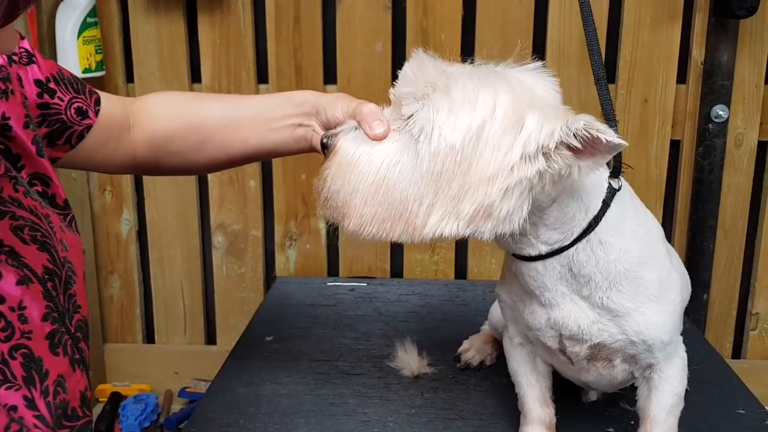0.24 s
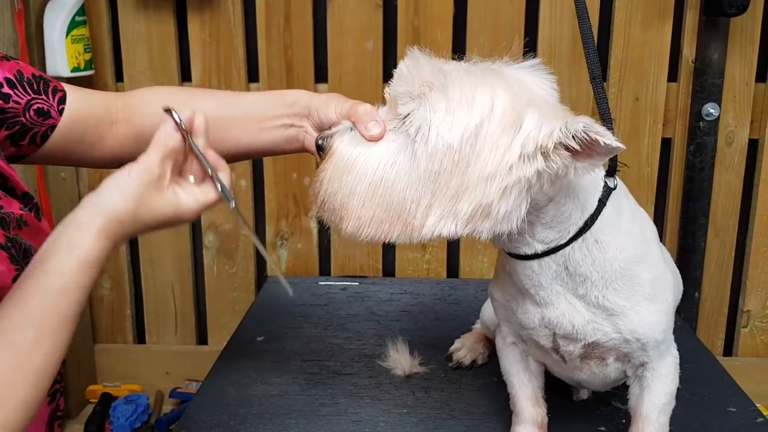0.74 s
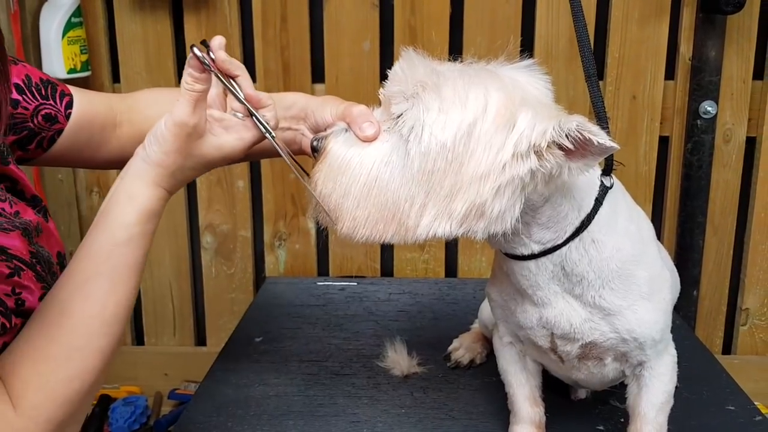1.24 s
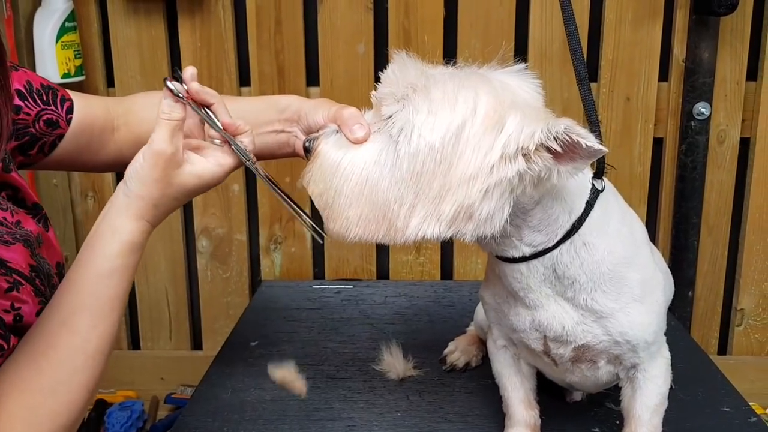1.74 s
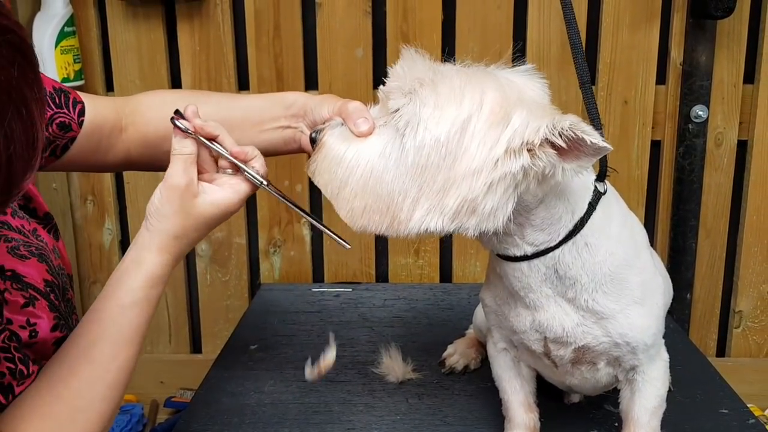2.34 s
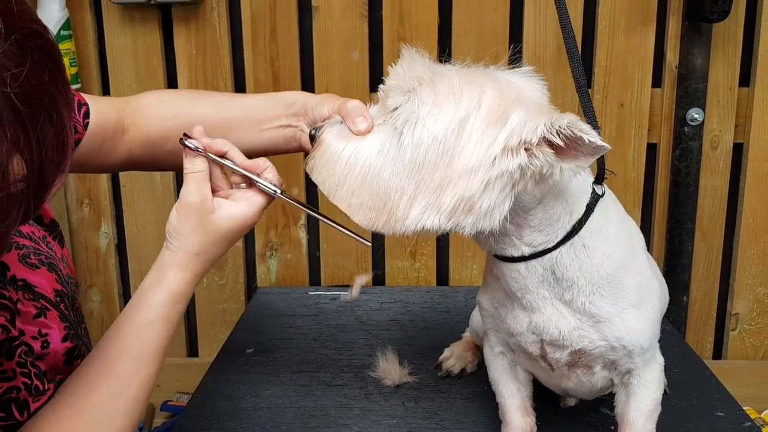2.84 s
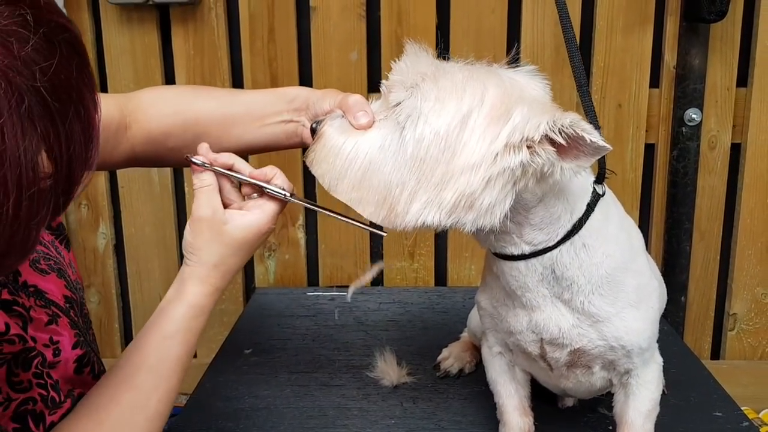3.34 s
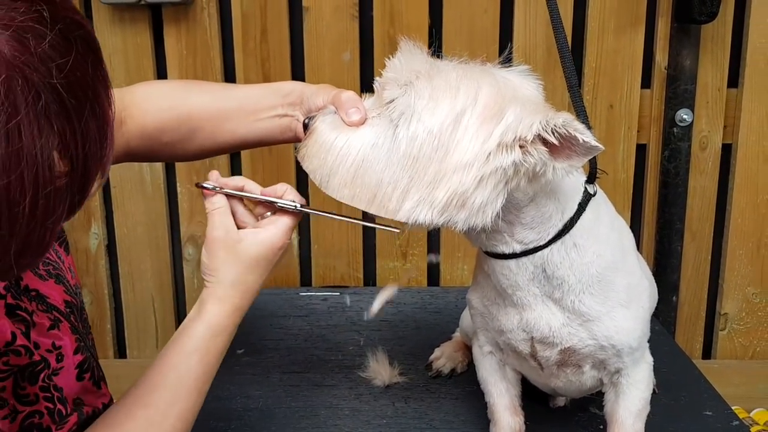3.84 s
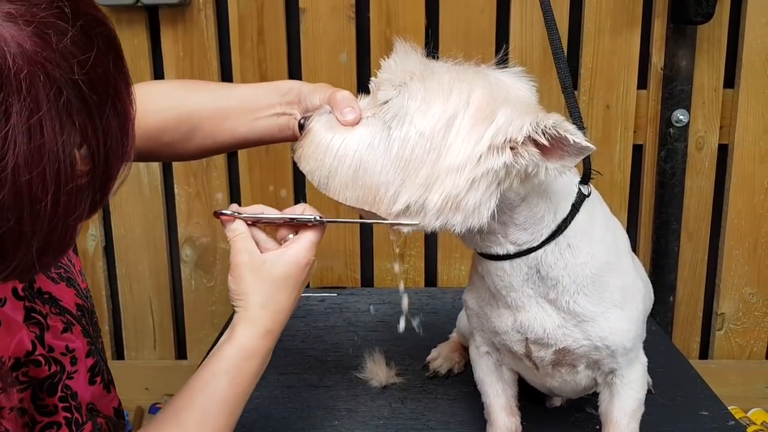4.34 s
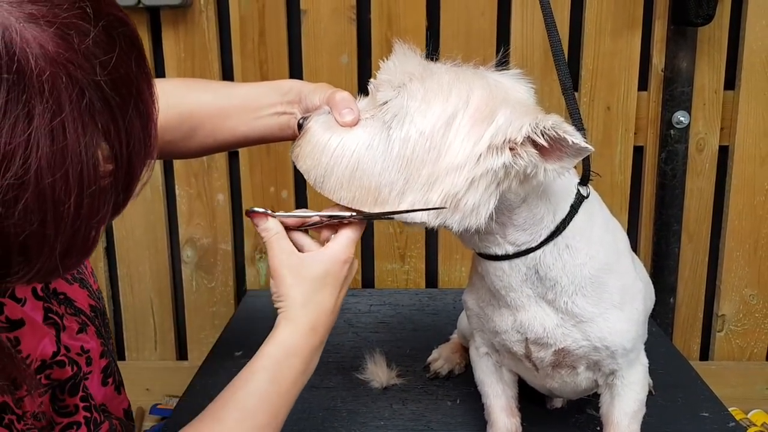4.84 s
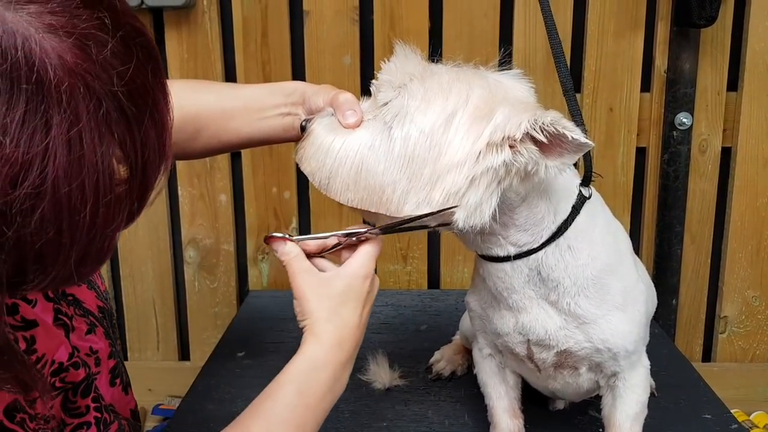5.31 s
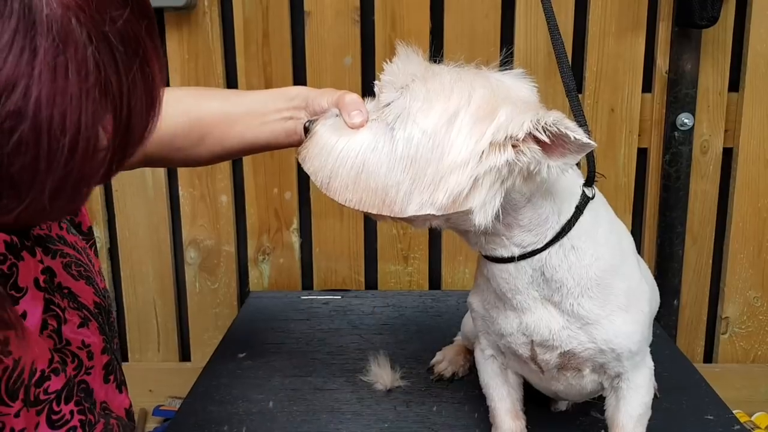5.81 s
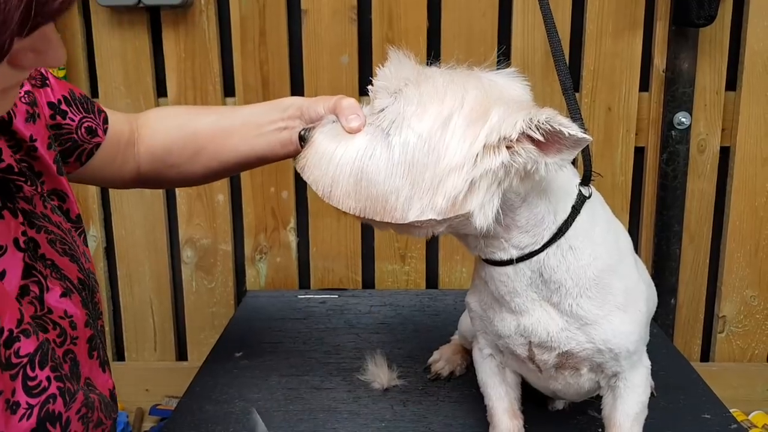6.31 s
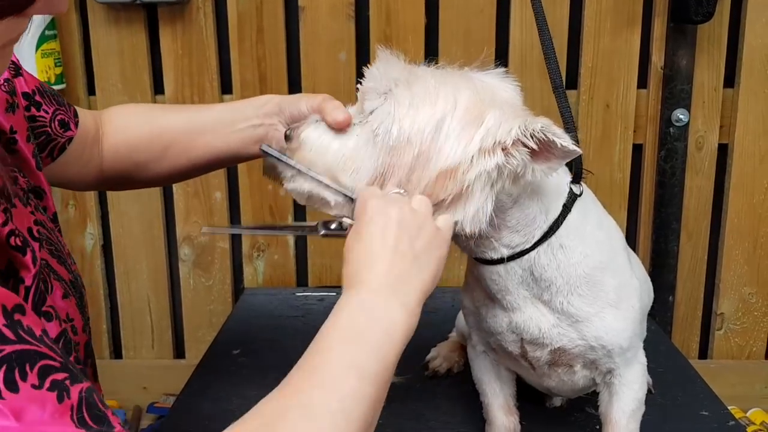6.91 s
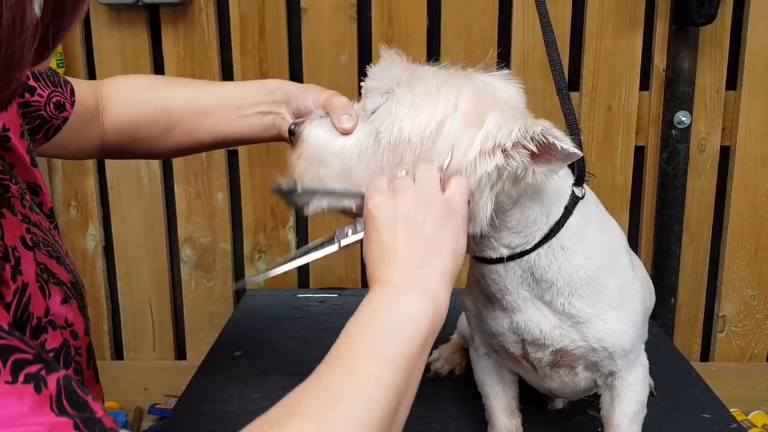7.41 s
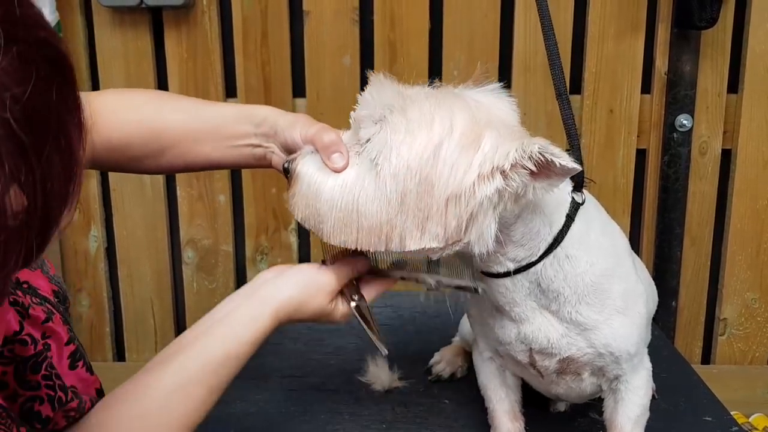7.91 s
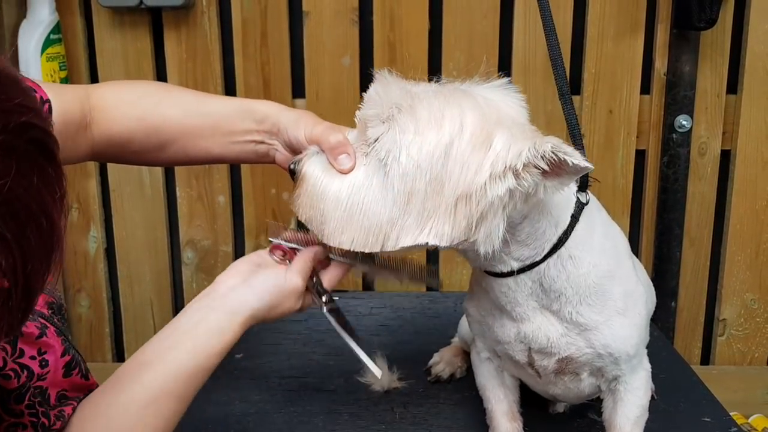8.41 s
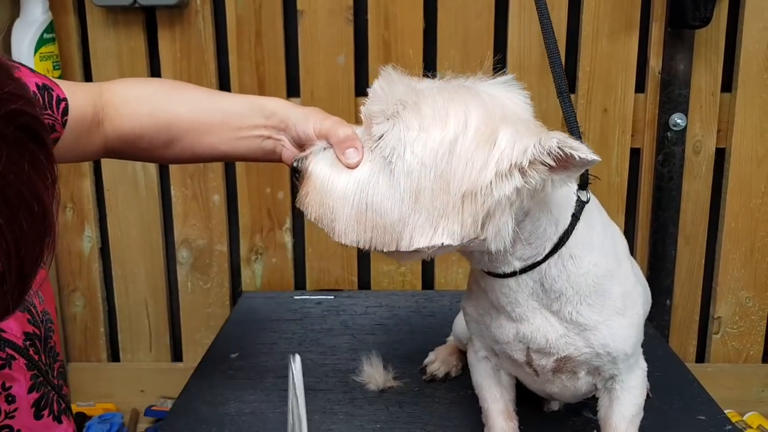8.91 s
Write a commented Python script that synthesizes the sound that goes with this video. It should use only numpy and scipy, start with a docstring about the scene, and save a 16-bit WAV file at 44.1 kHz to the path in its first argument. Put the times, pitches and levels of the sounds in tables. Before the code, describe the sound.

Scissors crunch through dry dog hair in eight crisp snips with squeaky openings, then tools clink and one loud hollow knock hits the table.

```python
"""Long steel scissors rasp through a dog's beard in a small wood-lined room, each cut ending in a click.
The blades chirp as they open again; tools clink, sleeves and fur rustle, and at last a tool lands hard
on the hollow grooming table. Friction is coloured random grains, the chirp a falling tone, struck steel
and wood are sums of decaying modes, rubbing is noise that swells and fades; air and a dull drone lie beneath."""
import sys
import numpy as np
from scipy import signal
from scipy.fft import rfft, irfft, next_fast_len
from scipy.io import wavfile

SR = 44100
rng = np.random.default_rng(int(sys.argv[2]) if len(sys.argv) > 2 else 0)


def master_out(mix):
    """Clip the mix to full scale and print it as 16-bit PCM to the path in sys.argv[1]."""
    frames = np.transpose(np.atleast_2d(mix))
    ceiling = np.clip(frames, -1, 1)
    pcm = np.round(ceiling * 32767).astype(np.int16)
    wavfile.write(sys.argv[1], SR, pcm)


N = 403956
TIME = np.arange(N) / SR

# Closing strokes: shut t/s, stroke length t/s, hair met before the shut t/s, time in the hair t/s,
# rasp level/dB, final shear level/dB, finger-stop tap level/dB, left-right level/dB, treble lift level/dB
CLOSING_STROKES = [(1.6130, .155, 0.052, 0.017, -55, -47.5, -49, -3, 5.5),
                   (2.232, 0.14, 0.085, 0.06, -56, -44, -47, -3.5, 1.5),
                   (2.8053, 0.13, 0.077, .058, -54, -40, -41, -4, -0.5),
                   (3.317, 0.11, 0.081, 0.064, -51.5, -36.5, -41, -3.5, 0.5),
                   (3.8122, .11, .070, 0.056, -50.5, -45, -48.5, -4.5, 5),
                   (4.4547, 0.29, 0.23, 0.097, -52, -36.5, -41.5, -4.5, -2.5),
                   (5.014, 0.11, .085, 0.087, -55.5, -40, -54, -4.5, 2),
                   (5.4705, .09, 0.067, 0.028, -51, -38, -49.5, -3.5, 3.5)]
# Opening strokes: squeak t/s, rasp level/dB, squeak level/dB, squeak f/Hz, left-right level/dB
OPENING_STROKES = [(1.792, -46.5, -45, 8170, -3), (2.423, -46, -40.5, 8360, -4.5),
                   (2.969, -45, -40, 8810, -2.5), (3.4945, -46, -35.5, 8710, -3),
                   (3.9782, -48, -34, 8760, -3.5), (4.643, -48, -60, 8620, -2.5),
                   (5.203, -49.5, -47, 8300, -2.5)]
# Clinks of scissors and comb: t/s, tick level/dB, ring level/dB
STEEL_CLINKS = [(0.228, -61.5, -83), (0.7245, -57.5, -81), (6.2579, -29.5, -63), (6.4315, -47, -66),
                (6.4876, -45.5, -78), (7.2916, -49, -62), (7.7536, -54.5, -62), (8.8136, -49, -57),
                (8.8753, -39, -47), (8.9085, -60, -53), (8.9861, -49, -53), (9.0215, -45, -51)]
# The tool lands on the table top, hops and lands again: t/s, level/dB, first contact brightness f/Hz
TABLE_BLOWS = [(8.9000, -11, 220), (8.9080, -7.5, 470), (8.9190, -8.3, 1600), (9.0050, -14.5, 2140),
               (9.0215, -18, 3370)]
# Padded bumps of paws, hands and tools on the table: t/s, level/dB, first contact brightness f/Hz
TABLE_BUMPS = [(0.004, -44, 1210), (0.070, -43.5, 580), (0.601, -56, 2120), (0.738, -57.5, 1500),
               (5.896, -48.5, 1000), (6.2585, -37, 2000), (6.279, -35, 1210), (6.303, -37.5, 1930),
               (6.486, -52.5, 3000), (8.867, -36, 2000)]
# Arm movements, and at 0.85 s an empty slide of the scissor blades:
# middle t/s, half length t/s, sleeve level/dB, fur or blade level/dB
RUBBING_MOVES = [(0.01, .1, -50.5, -70.5), (0.252, 0.048, -56.5, -74), (0.51, 0.12, -59, -83),
                 (0.86, .17, -56.5, -63.5), (0.85, 0.042, -78, -54), (6.012, 0.078, -55.5, -71.5),
                 (6.567, 0.18, -73, -69), (7.34, 0.043, -65, -72), (7.59, 0.1, -67, -71),
                 (7.882, 0.063, -73, -68), (8.27, 0.06, -64.5, -77), (8.692, 0.1, -68, -67.5)]
# Course of the dull drone, with a low rub of hair near 4.3 s: t/s, level/dB
DRONE_AND_RUB = [(0, -78), (1.1, -68), (2.6, -66.5), (3.7, -73.5), (4.3, -64), (5.6, -70), (6.8, -72.5),
                 (9.2, -77)]

# Modes of the hollow table: f/Hz, level/dB, t60/s
TABLE_MODES = [(86, -25, .9), (115, -15, .55), (164, -18, .35), (216, -5, .45), (245, -5, .12),
               (290, -10, .25), (311, -3.5, .45), (376, -1.5, .42), (451, -4, .3), (527, -8, .25),
               (573, -7, .2), (602, -4, .22), (691, -3, .18), (749, 0, .17), (800, -6, .15),
               (1060, -6, .12), (1097, -5, .13), (1740, -9, .13), (2073, -14, .22)]
# Modes of the steel tools: f/Hz, level/dB, t60/s
STEEL_MODES = [(4328, -13, .35), (6190, -14, .3), (7620, 0, .24), (8430, -5, .17), (10050, -7, .35),
               (11660, -14, .2), (12720, -6, .2), (13040, -9, .12)]

# Relative power spectrum of the cracking and rattling table top: f/Hz, level/dB
BOARD_SPECTRUM = [(25, -32), (55, -17), (105, -11.5), (230, 2), (480, 0), (750, 1), (1120, 0.5),
                  (1400, -9.5), (1850, -3), (2600, -13), (4000, -20), (8000, -25), (16000, -48)]
# Relative power spectrum of padded bumps: f/Hz, level/dB
THUMP_SPECTRUM = [(50, -17), (120, -14), (210, 6.5), (290, -3), (380, 0.5), (520, -3), (850, -15),
                  (2300, -9.5), (3500, -11), (16000, -61)]
# Relative power spectrum of hair being cut: f/Hz, level/dB
SHEAR_SPECTRUM = [(400, -32), (2000, -21), (2700, -16), (3300, -17), (3900, -4.5), (4600, -2.5), (5300, -5),
                  (6000, -10), (7300, -5), (8100, 1), (10200, -2), (12700, 1), (13700, -8), (15500, -8)]
# Relative power spectrum of bare edges sliding: f/Hz, level/dB
SLIDE_SPECTRUM = [(1000, -32), (4000, -43), (6200, -15), (7200, -4), (8000, -9.5), (8700, -1),
                  (10000, -2.5), (11200, -12), (12300, -4.5), (13500, -15.5), (16000, -17)]
# Relative power spectrum of the finger rings meeting: f/Hz, level/dB
TAP_SPECTRUM = [(120, -16), (330, 1), (600, 5.5), (1000, -2), (1600, -11), (2600, -7), (4000, -9),
                (8000, -4.5), (16000, -44)]
# Relative power spectrum of a steel tick: f/Hz, level/dB
TICK_SPECTRUM = [(300, -12), (1400, -9), (2400, -4), (3700, -6), (6000, -3), (9000, 1), (12500, -1),
                 (15500, -8)]
# Relative power spectrum of brushed fur and the empty blade slide: f/Hz, level/dB
BRUSH_SPECTRUM = [(240, -38), (400, -35), (595, 2.5), (1360, -7.5), (2430, -13), (3210, -19), (3850, -8.5),
                  (5560, -9), (8530, -5), (15500, -18)]
# Relative power spectrum of a rubbed sleeve: f/Hz, level/dB
CLOTH_SPECTRUM = [(40, -11.5), (90, 3.5), (140, 4), (210, -3.5), (300, -9), (600, -15.5), (1100, -17),
                  (2000, -27.5), (5000, -54), (16000, -47)]
# Relative power spectrum of the room air: f/Hz, level/dB
AIR_SPECTRUM = [(13, -39), (22, -2), (76, 2), (168, -8.5), (203, -12.5), (371, -16.5), (475, -24.5),
                (516, -19), (846, -24), (1140, -26), (1460, -31), (3820, -36.5), (6270, -37), (7190, -37.5),
                (15500, -34)]
# Relative power spectrum of the drone and the low rub: f/Hz, level/dB
DRONE_SPECTRUM = [(25, -9), (45, 13), (80, -7.5), (200, -8), (400, -8.5), (700, -11.5), (1080, -3.5),
                  (1400, -23), (2500, -28.5), (16000, -60)]

# Left-right likeness of diffuse sound: f/Hz, correlation
SIDE_CORRELATION = [(60, 0.95), (250, 0.87), (450, 0.67), (750, 0.13), (1400, 0), (3000, 0), (16000, 0)]
# Decay of the wood-lined room: f/Hz, t60/s
ROOM_DECAY = [(100, 0.25), (400, 0.15), (1500, 0.36), (4000, 0.19), (9000, 0.17), (16000, 0.12)]

SLIDE_DB = -63  # bare edges slide throughout the stroke, fastest in its middle
SETTLE_S = 0.015  # the blades come to rest just after the shut
# The rasp grows as hair bunches towards the tips
HAIR_ATTACK_S, HAIR_RELEASE_S, HAIR_SWELL_DB = 0.009, 0.0054, 3
TUFTS_PER_S, TUFT_DB = 140, 4  # uneven thickness of the hair
BITE_S, STOP_S, TAP_S = 0.0061, 0.0023, 0.0067  # rise and fall of the final shear; decay of the tap
OPEN_LEAD_S = 0.0155  # the blades part this long before the squeak
# Chatter after each contact: mean gap, loss per rebound and share of brightness kept
REBOUND_S, REBOUND_LOSS_DB, REBOUND_DULLS = 0.018, 6, 0.78
REST_SLEEVE_DB, REST_BRUSH_DB = -71.5, -84.5  # between movements
AIR_DB = -62
CUTOFF_HZ = 15800


def closing():
    """Stick-slip friction: edges slide, rasp through hair, shear hardest at the tips; finger rings tap."""
    force, edges, taps = np.zeros((3, 2, N))
    t_tap = span(0.022)
    tufts = from_db(TUFT_DB * flicker(TUFTS_PER_S))
    for shut, stroke, lead, length, rasp_db, shear_db, tap_db, side_db, _ in CLOSING_STROKES:
        meet = shut - lead
        start, through = shut - stroke, meet + length
        t = start + span(shut + SETTLE_S - start)
        depth = np.clip((t - meet) / length, 0, 1)
        attack = np.minimum(t - meet, 0) / HAIR_ATTACK_S
        release = np.maximum(t - through, 0) / HAIR_RELEASE_S
        in_hair = np.exp(attack - release)
        rasp = from_db(rasp_db + HAIR_SWELL_DB * (depth - 1.0)) * in_hair * np.interp(t, TIME, tufts)
        shear = from_db(shear_db) * np.exp(np.minimum(t - shut, 0) / BITE_S)
        stop = np.exp(-np.maximum(t - shut, 0) / STOP_S)
        speed = np.sin(np.linspace(0, np.pi, len(t)))
        add(force, start, np.hypot(rasp, shear) * stop * pan(side_db))
        add(edges, start, from_db(SLIDE_DB) * speed * pan(side_db))
        add(taps, shut, from_db(tap_db) * diffuse(len(t_tap)) * np.exp(-t_tap / TAP_S))
    hair = tint(force * friction(per_s=3200, size_db=3), SHEAR_SPECTRUM)
    steel = tint(edges * friction(per_s=14000, size_db=1.5), SLIDE_SPECTRUM)
    return off_axis(crisp(hair) + steel) + tint(taps, TAP_SPECTRUM)


def opening(rise_s=0.0034, slide_s=0.032, squeak_s=0.002, glide_s=0.002, lead_db=-11, overshoot=0.4,
            sink_db=-5, sink_s=0.01, low_hz=4300):
    """Friction-driven resonance: as the crossing nears the pivot a squeak falls, flares, sinks to a scrape."""
    force, squeaks, scrapes = np.zeros((3, 2, N))
    t = span(0.089)
    u = t - OPEN_LEAD_S  # time from the squeak's peak
    for peak, rasp_db, squeak_db, hz, side_db in OPENING_STROKES:
        start = peak - OPEN_LEAD_S
        rasp = from_db(rasp_db) * (1 - np.exp(-t / rise_s)) * np.exp(-(t / slide_s) ** 4)
        pitch = hz * (1 + overshoot * (1 - np.tanh(u / glide_s + 2)) / 2)
        # a faint early swell during the glide, then the flare at the blade resonance
        flare = np.exp(-(u / squeak_s) ** 2 / 2) + from_db(lead_db) * np.exp(-(u / glide_s + 2) ** 2)
        jitter = np.cumsum(rng.normal(0, 0.049, len(t)))
        phase = 2 * np.pi * np.cumsum(pitch) / SR + jitter
        squeak = from_db(squeak_db) * np.sqrt(2) * flare * np.sin(phase)
        sinking_hz = low_hz + (hz - low_hz) * np.exp(-np.maximum(u, 0) / sink_s)
        scrape = from_db(sink_db) * rasp * (u > 0) * swept(sinking_hz, width_hz=1680)
        add(force, start, rasp * pan(side_db))
        add(squeaks, start, squeak * pan(side_db))
        add(scrapes, start, scrape * pan(side_db))
    slide = tint(force * friction(per_s=7000, size_db=3), SLIDE_SPECTRUM)
    return off_axis(slide + scrapes), off_axis(squeaks)


def clinks(tick_s=0.0057):
    """Impact excitation: steel touching steel gives a short noisy tick and a thin modal ring."""
    ticks, rings = np.zeros((2, 2, N))
    t = span(0.44)
    for s, tick_db, ring_db in STEEL_CLINKS:
        add(ticks, s, from_db(tick_db) * rng.standard_normal((2, len(t))) * np.exp(-t / tick_s))
        steel = np.array([ringing(STEEL_MODES, t, spread_db=2) for side in range(2)])
        add(rings, s, from_db(ring_db) * steel)
    return room(tint(ticks, TICK_SPECTRUM), wet_db=-0.5, gap_s=0.0037) + rings


def knocks(blows, spectrum, modes_db, rattle_t60, crack_db, count):
    """Contact filtering: crack, rattle and table modes, then duller rebounds; soft contacts lack highs."""
    out, t = np.zeros((2, N)), span(0.49)
    for s, db, bright_hz in blows:
        for k in range(count):
            rattle = diffuse(len(t)) * from_db(-60 * t / rattle_t60)
            crack = -from_db(crack_db) * (t == 0)
            body = tint(rattle + crack, spectrum)
            if k == 0:  # only the first contact rings the modes
                body = body + from_db(modes_db) * ringing(TABLE_MODES, t, spread_db=1)
            contact_hz = min(bright_hz * REBOUND_DULLS ** k, SR / 4)
            contact = signal.butter(2, contact_hz, fs=SR, output="sos")
            late = k * REBOUND_S * rng.uniform(0.85, 1.15)
            add(out, s + late, from_db(db - k * REBOUND_LOSS_DB) * signal.sosfilt(contact, body))
    return out * pan(0.72)


def rustle(grain_db=1.5, scuff_db=2.05):
    """Rubbing noise follows speed: sleeve, brushed fur and an empty blade slide swell and fade."""
    sleeve, brush = from_db(REST_SLEEVE_DB), from_db(REST_BRUSH_DB)
    for s, half, sleeve_db, brush_db in RUBBING_MOVES:
        speed = (1 + ((TIME - s) / half) ** 2 / 2) ** -1.5
        sleeve = np.hypot(sleeve, from_db(sleeve_db) * speed)
        brush = np.hypot(brush, from_db(brush_db) * speed)
    grains = from_db(grain_db * flicker(per_s=240))
    scuffs = from_db(scuff_db * flicker(per_s=30))
    rubbed = sleeve * scuffs * tint(diffuse(N), CLOTH_SPECTRUM)
    brushed = brush * grains * tint(diffuse(N), BRUSH_SPECTRUM)
    return rubbed + brushed


def background():
    """Diffuse-field noise: steady room air, and a dull drone that also carries a low rub of hair."""
    air = from_db(AIR_DB) * tint(diffuse(N), AIR_SPECTRUM)
    drone_and_rub = from_db(in_time(DRONE_AND_RUB)[0]) * tint(diffuse(N), DRONE_SPECTRUM)
    return air + drone_and_rub


def room(x, wet_db, gap_s, count=9):
    """Reverberation: dense reflections from wooden walls decay exponentially, at a rate set by band."""
    t = span(0.6)
    size = 2 * len(t)
    noise = rfft(diffuse(len(t)), size)
    centres = np.geomspace(62.5, 16000, count)
    hz, tail = np.fft.rfftfreq(size, 1 / SR), 0
    for centre, share in zip(centres, np.eye(count)):
        onset = np.clip(t / gap_s - 1, 0, 1)  # silent for one gap, full after two
        decay = from_db(-60 * t / at_hz(ROOM_DECAY, centre)) * onset
        band = irfft(noise * at_hz(np.c_[centres, share], hz))[:, :len(t)]
        tail = tail + band * decay / np.linalg.norm(decay)
    return x + from_db(wet_db) * convolve(x, tail)


def friction(per_s, size_db):
    """Stick-slip as a random impulse train: tiny slips and snapping hairs of uneven size; rms 1."""
    slips = rng.random(N) < per_s / SR
    sizes = from_db(size_db * np.minimum(rng.exponential(1, N), 4))
    grains = slips * sizes * rng.choice([-1, 1], N)
    return grains / grains.std()


def swept(hz, width_hz):
    """Moving resonance: low-passed noise modulates a carrier of gliding frequency; rms about 1."""
    low_pass = signal.butter(2, width_hz / 2, fs=SR, output="sos")
    band = signal.sosfilt(low_pass, rng.standard_normal((2, len(hz))))
    phase = 2 * np.pi * np.cumsum(hz) / SR
    return (band[0] * np.cos(phase) + band[1] * np.sin(phase)) / band.std()


def crisp(hair, edge_hz=10500):
    """Spectral tilt: thin dry hair adds a treble lift that differs from cut to cut."""
    lift_db = in_time([(cut[0], cut[-1]) for cut in CLOSING_STROKES])[0]
    high_pass = signal.butter(2, edge_hz, "high", fs=SR, output="sos")
    treble = signal.sosfiltfilt(high_pass, hair)
    return hair + (from_db(lift_db) - 1) * treble


def ringing(modes, t, spread_db):
    """Modal superposition: decaying sines whose strengths vary a little from hit to hit."""
    hz, db, t60 = np.transpose(modes)[:, :, None]
    signs = (-1) ** np.arange(len(modes))[:, None]
    strength = from_db(db + spread_db * rng.standard_normal(db.shape)) * signs
    partials = strength * from_db(-60 * t / t60) * np.sin(2 * np.pi * hz * t)
    return np.sum(partials, axis=0) / np.linalg.norm(from_db(db))


def flicker(per_s):
    """Random modulation: linearly joined normal values, with a spread of about 1 at the joints."""
    return np.interp(TIME * per_s, np.arange(4096), rng.standard_normal(4096))


def diffuse(size):
    """Diffuse field: stereo white noise whose left-right correlation depends on frequency."""
    padded = 2 * next_fast_len(size // 2 + 1)
    mid, side = rfft(rng.standard_normal((2, padded)))
    alike = np.clip(at_hz(SIDE_CORRELATION, np.fft.rfftfreq(padded, 1 / SR)), -1, 1)
    both = np.sqrt(1 + alike) * mid + np.sqrt(1 - alike) * side * [[1], [-1]]
    return irfft(both)[:, :size] / np.sqrt(2)


def tint(x, spectrum, size=8192):
    """Minimum-phase filtering: causal colouring that keeps the power of white noise."""
    cepstrum = irfft(np.log(from_db(at_hz(spectrum, np.fft.rfftfreq(size, 1 / SR)))))
    # folding the cepstrum onto positive times makes the filter causal
    cepstrum[1:size // 2] *= 2
    cepstrum[size // 2 + 1:] = 0
    response = irfft(np.exp(rfft(cepstrum)))
    return convolve(x, response / np.linalg.norm(response))


def off_axis(x, order=16):
    """Interchannel delay: sound from the scissors reaches the left microphone some samples late."""
    return np.array([np.roll(x[0], order), x[1]])


def pan(db):
    """Interchannel level difference: left and right gains."""
    return from_db(np.array([[db], [-db]]) / 2)


def convolve(x, response):
    """Linear-system response: pass a sound through an impulse response."""
    full = signal.fftconvolve(np.atleast_2d(x), np.atleast_2d(response), axes=-1)
    return full[:, :np.shape(x)[-1]]


def add(out, s, sound):
    """Superposition: mix a short sound in at a given time."""
    at = max(round(s * SR), 0)
    out[..., at:at + sound.shape[-1]] += sound[..., :N - at]


def span(seconds):
    """Uniform sampling: sample times of a short sound."""
    return np.arange(int(seconds * SR)) / SR


def in_time(rows):
    """Linear interpolation: each column of a curve at every sample."""
    s, *columns = np.transpose(rows)
    return [np.interp(TIME, s, c) for c in columns]


def at_hz(points, hz):
    """Interpolation of a table on a log-frequency axis."""
    f, value = np.transpose(points)
    return np.interp(np.log(np.maximum(hz, 1)), np.log(f), value)


def from_db(db):
    """Logarithmic level: decibels to amplitude gain."""
    return 10 ** (np.asarray(db) / 20)


def scene():
    """Superposition of scissors, tools and table in the room, over rubbing, air and drone."""
    scrapes, squeaks = opening()
    scissors = room(closing() + scrapes, wet_db=-3, gap_s=0.0015)
    chirps = room(squeaks, wet_db=-5.5, gap_s=0.0037)  # beamed straight at the microphones, so drier
    blows = knocks(TABLE_BLOWS, BOARD_SPECTRUM, modes_db=-3.5, rattle_t60=0.082, crack_db=15.5, count=4)
    bumps = knocks(TABLE_BUMPS, THUMP_SPECTRUM, modes_db=-9, rattle_t60=0.092, crack_db=10, count=2)
    table = room(blows + bumps, wet_db=-8.0, gap_s=0.0085)
    return scissors + chirps + clinks() + table + rustle() + background()


def record(dry):
    """Band limitation: a steep elliptic low-pass cuts the top."""
    return signal.sosfilt(signal.ellip(12, 0.1, 80, CUTOFF_HZ, fs=SR, output="sos"), dry)


dry = scene()
out = record(dry)
master_out(out)
```